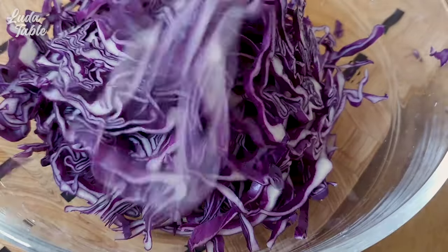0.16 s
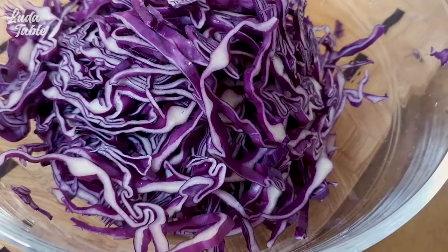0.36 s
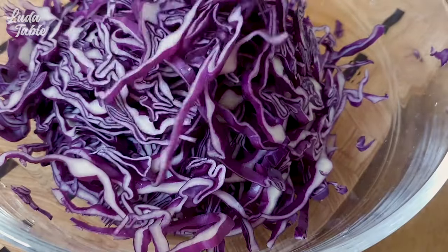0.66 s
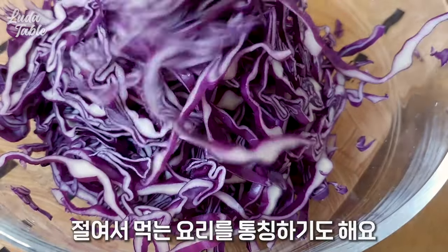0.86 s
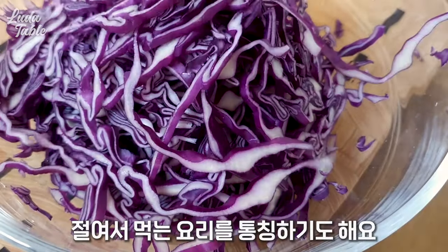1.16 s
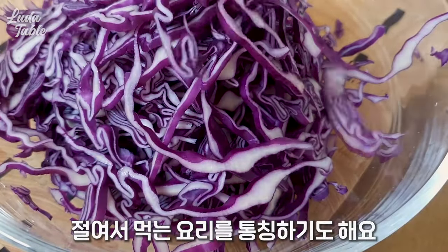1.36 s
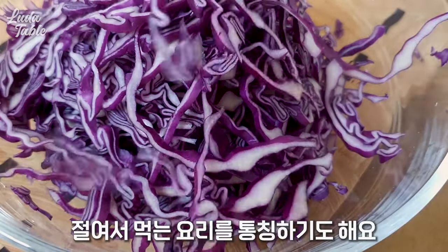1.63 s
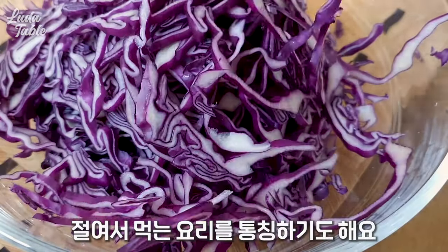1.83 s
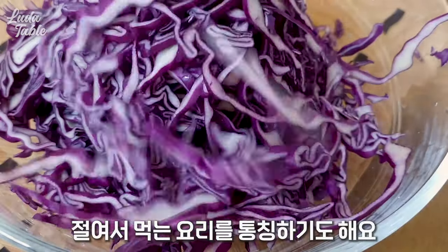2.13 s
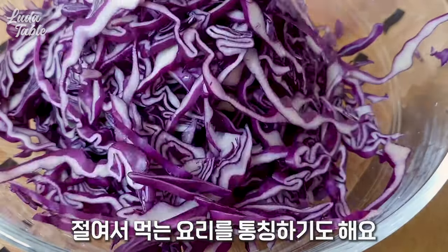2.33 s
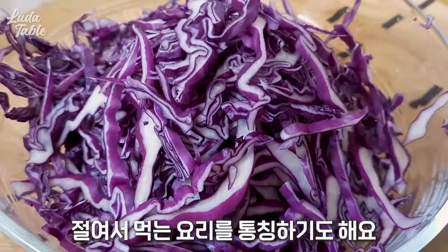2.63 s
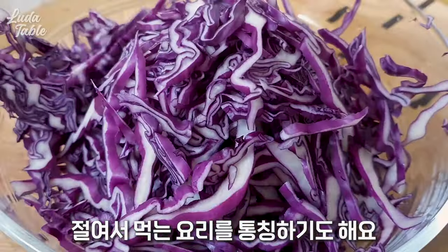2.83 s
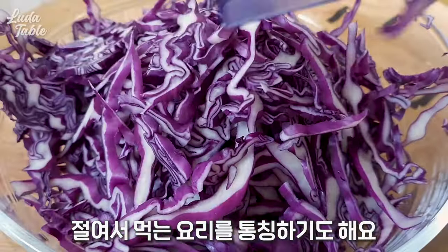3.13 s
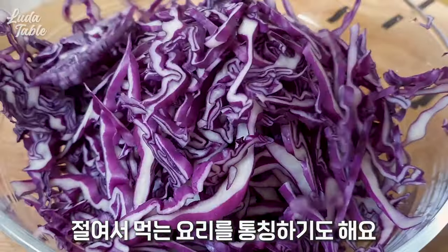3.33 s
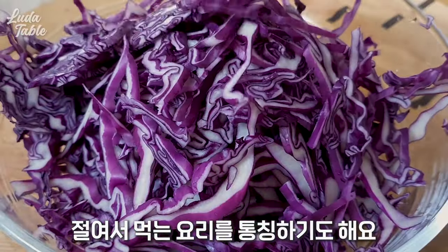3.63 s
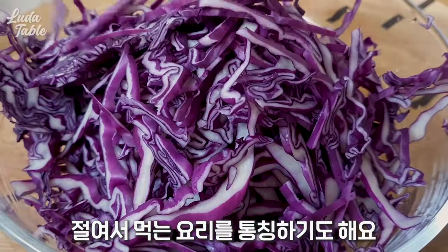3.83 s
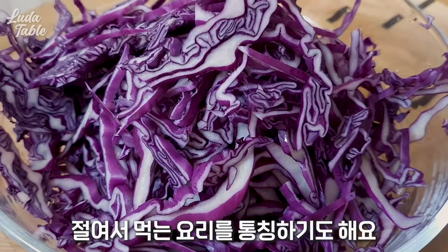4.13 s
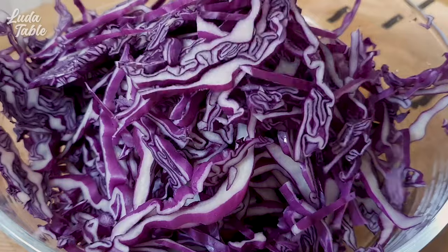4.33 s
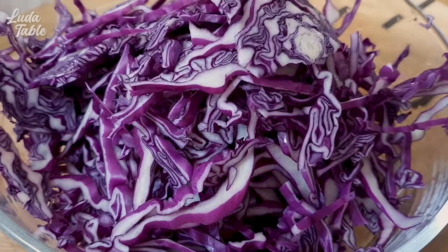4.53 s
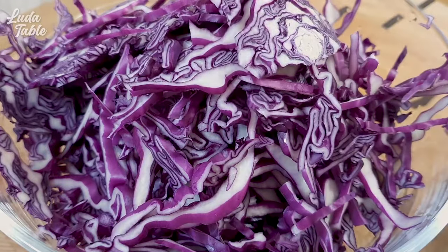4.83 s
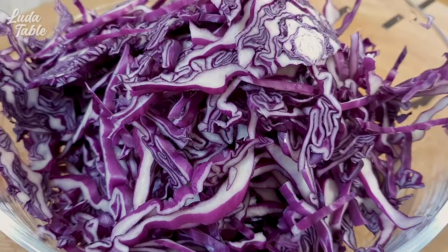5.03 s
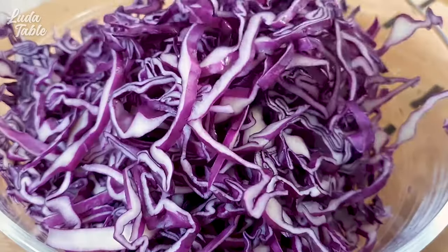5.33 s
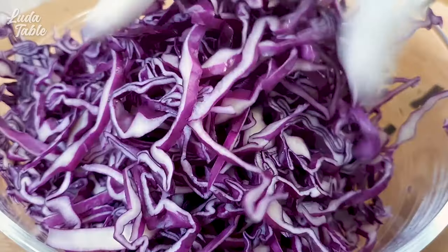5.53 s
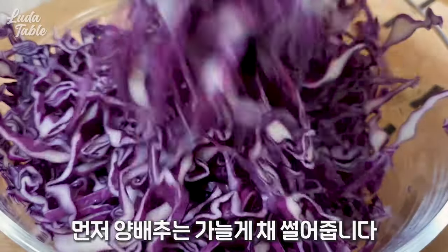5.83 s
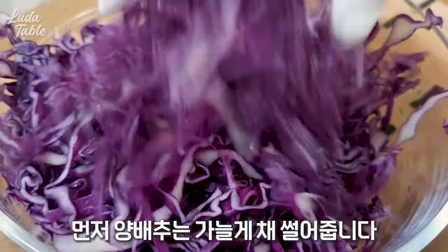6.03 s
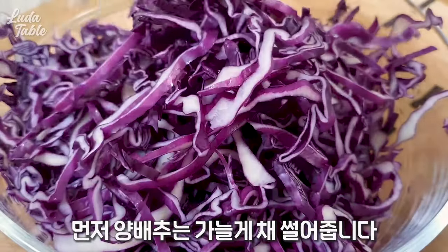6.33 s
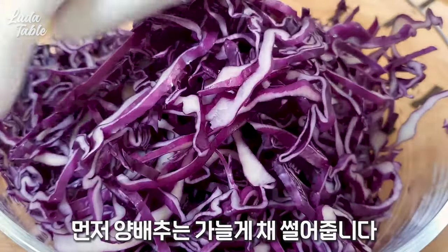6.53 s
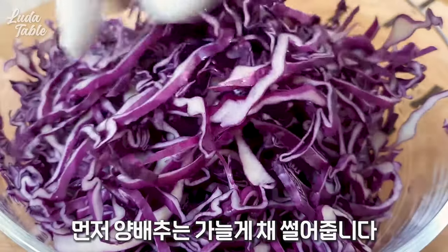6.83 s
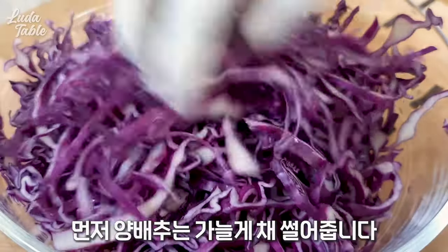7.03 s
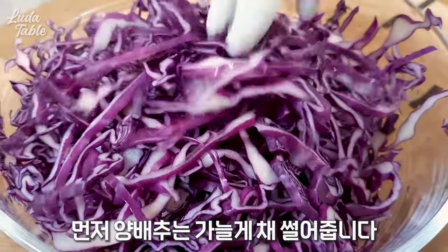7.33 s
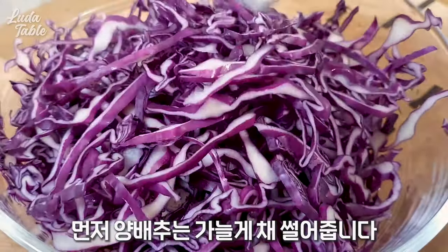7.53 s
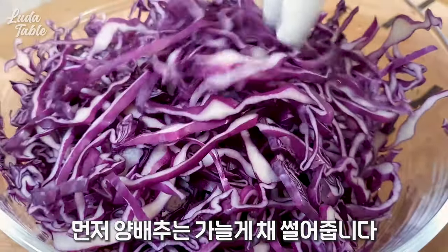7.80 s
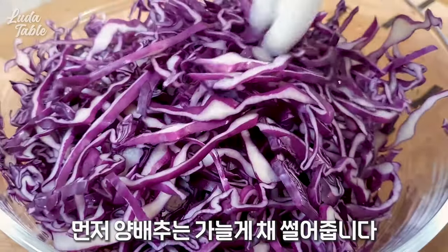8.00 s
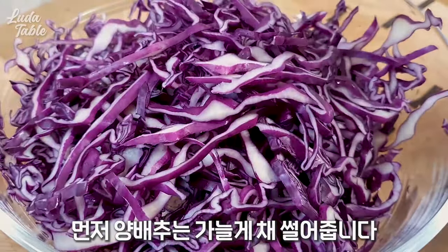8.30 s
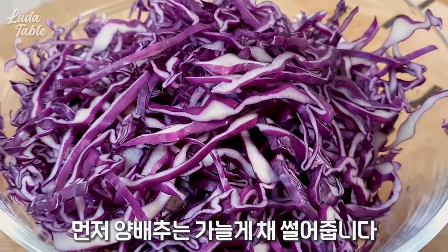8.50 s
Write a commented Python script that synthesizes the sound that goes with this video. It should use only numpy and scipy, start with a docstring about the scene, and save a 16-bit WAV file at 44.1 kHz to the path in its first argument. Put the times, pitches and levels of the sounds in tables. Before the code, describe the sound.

A knife shreds crisp cabbage on a wooden board in quick crunching strokes, speeding up, then shreds rustle softly in a bowl.

```python
"""A knife shreds crisp cabbage on a wooden board, close by: crunching strokes are random bursts of cells,
knocks are noise cracks over ringing board modes, ribs pop as short sines and the blade rings faintly.
The last three strokes are looped, at the end a third faster and higher. After a cut, gloved fingers quietly
toss the shreds in a bowl: swelling bands of grains and tuned taps, over kitchen rumble and hiss of noise."""
import sys
import numpy as np
from scipy import signal
from scipy.io import wavfile
from scipy.ndimage import map_coordinates

SR = 44100
rng = np.random.default_rng(int(sys.argv[2]) if len(sys.argv) > 2 else 0)


def put_to_file(sound):
    """Save the sound as 16-bit audio at rate SR, in the file named by the first command-line argument."""
    columns = np.atleast_2d(sound).T  # one column per channel
    safe = np.clip(columns, -1, 1)
    whole_steps = np.round(safe * 32767)
    wavfile.write(sys.argv[1], SR, whole_steps.astype(np.int16))


def gain_from_db(level_db):
    """Turn a decibel level (scalar or array-like) into a linear amplitude factor."""
    decades = np.asarray(level_db, float) / 20
    return 10 ** decades


N = 381906


def in_time(rows, count):
    """Join the columns of a curve by straight lines over count samples."""
    s, *columns = np.transpose(rows)
    return [np.interp(np.arange(count) / SR, s, column) for column in columns]


def rms_one(x):
    """Scale to unit power."""
    return x / np.sqrt(np.mean(x ** 2) + 1e-20)


def drift(count, per_s):
    """Seven slow random curves through knots of spread 1, per_s knots a second."""
    knots = rng.standard_normal((7, int(count * per_s / SR) + 2))
    at = np.arange(count) * per_s / SR
    return np.array([np.interp(at, np.arange(len(k)), k) for k in knots])


def power_sum(levels_db):
    """Level of several sounds heard together: their powers add."""
    return 10 * np.log10(sum(gain_from_db(2 * db) for db in levels_db))


def swell(t, s, db, rise_s, fall_s):
    """Level that climbs to db at s and sinks again, 20 dB per given time (5 ms at least)."""
    return db - 20 * np.maximum((s - t) / max(rise_s, .005), (t - s) / max(fall_s, .005))


def ring(clicks, hz, t60):
    """Two-pole resonator: a unit click sets a dying sine of height 1 ringing."""
    radius, w = gain_from_db(-60 / (t60 * SR)), 2 * np.pi * hz / SR
    return signal.lfilter([0, np.sin(w)], [1, -2 * radius * np.cos(w), radius ** 2], clicks + 1e-18)


def bank(sources, spectrum, low_hz, high_hz):
    """Third-octave bands, each fed by one source in turn and weighted by the spectrum; rms 1."""
    edges = np.geomspace(low_hz, high_hz, round(3 * np.log2(high_hz / low_hz)) + 1)
    hz, db = np.transpose(spectrum)
    gains = gain_from_db(np.interp(np.log(edges[1:] * edges[:-1]) / 2, np.log(hz), db))
    out = 0
    for k, gain in enumerate(gains):
        band = signal.butter(2, edges[k:k + 2], "band", fs=SR, output="sos")
        out = out + gain * signal.sosfilt(band, sources[k % len(sources)])
    return rms_one(out)


def grains(count, per_s, spread_db, shared, patchy_db):
    """Seven trains of cells bursting at random, in clumps, a few much louder; broad bursts reach every train."""
    sizes = gain_from_db(spread_db * np.minimum(rng.exponential(1, (8, count)), 4))
    signs = rng.choice([-1, 1], (8, count))
    trains = sizes * signs * (rng.random((8, count)) < per_s / SR)
    # fast clumps and a slower change of colour, plus clumps common to all trains
    unevenness = drift(count, 220) + .45 * drift(count, 20) + .7 * drift(count, 130)[0]
    return gain_from_db(patchy_db * unevenness) * (trains[1:] + shared * trains[0])


def bursts(events, count, rise_s, fall_s):
    """Envelope of short blows, each peaking at the level in its second column."""
    clicks, t = np.zeros(count), np.arange(3000) / SR
    clicks[[round(e[0] * SR) for e in events]] = gain_from_db(np.array([e[1] for e in events]))
    shape = np.exp(-t / fall_s) * (1 - np.exp(-t / rise_s))
    return signal.fftconvolve(clicks, shape / shape.max())[:count]


# colour of the steady hiss: pitch_hz, density_db (per Hz)
HISS_COLOUR = [(2650, -23), (4800, 2), (9710, 3.5), (16000, -52)]
# how loud the hiss sits before it wanders: time_s, level_db
HISS_LEVEL = [(4.47, -78), (4.75, -81.5), (5.185, -80.5), (5.205, -76), (5.6, -71.5), (6.5, -77.5),
              (7.2, -79.5), (7.8, -78), (8.0, -80), (8.2, -77.5), (8.65, -79)]
# colour of the low rumble: pitch_hz, density_db (per Hz)
RUMBLE_COLOUR = [(20, -28), (37, -10.5), (59, 0.5), (248, -15.5), (286, -25), (600, -27.5)]
# how loud the rumble sits before handling adds to it: time_s, level_db
RUMBLE_LEVEL = [(4.47, -60.5), (4.75, -78), (5.0, -70), (6.45, -66.5), (7.6, -67), (8.45, -66.5),
                (8.65, -77.5)]


def room(start, bright_db):
    """Kitchen bed: banded noise for murmur, hiss and a rumble that handling the bowl swells."""
    count = N - start
    wander = drift(count, 4.5)   # the room is never quite steady
    murmur_colour = [(400, -5.5), (1000, -3.5), (3300, -14.0)]   # pitch_hz, density_db (per Hz)
    murmur = bank(rng.standard_normal((2, count)), murmur_colour, 487, 3140)
    out = gain_from_db(-83.5 + 4.9 * wander[0]) * murmur
    hiss_db = in_time(HISS_LEVEL, N)[0][start:]
    out += gain_from_db(hiss_db + wander[1]) * bank(rng.standard_normal((2, count)), HISS_COLOUR, 3300, 11500)
    # handling shakes the bowl on the counter
    rumble_gain = gain_from_db(in_time(RUMBLE_LEVEL, N)[0][start:]) + gain_from_db(0.66 * bright_db - 22.0)
    return out + rumble_gain * bank(rng.standard_normal((2, count)), RUMBLE_COLOUR, 22.0, 496)


# shreds drop and tick in the bowl: time_s, strength_db, pitch_hz
DROPS = [(4.773, -53.5, 1680), (5.227, -51, 1510), (5.485, -45, 2370), (5.735, -36, 1626),
         (5.791, -49, 1220), (6.645, -41.5, 1780), (6.708, -28.5, 649), (6.724, -27.5, 1140),
         (6.76, -41.5, 452), (8.119, -45.5, 4700), (8.227, -50, 5500)]


def drops(count, start):
    """A short noisy tap, coloured by the pitch of the piece that falls."""
    out, t = np.zeros(count), np.arange(800) / SR
    puffs = rng.standard_normal((len(DROPS), 800))
    for (s, strength_db, hz), puff in zip(DROPS, puffs):
        at = round(s * SR) - start
        tap = puff * np.exp(-t / .004)
        tap = rms_one(ring(tap, hz, 17.0 / hz)) + 0.29 * rms_one(np.diff(tap, prepend=0))
        out[at:at + len(t)] += gain_from_db(strength_db - 5.0) * tap / np.abs(tap).max()
    return out


# rustles in the bowl: time_s, level_db (ahead of the bowl's colouring), rise_ms and fall_ms (per 20 dB),
# pitch_hz, width_octaves
RUSTLES = [(4.777, -69, 3, 57.5, 1500, 2.24), (5.21, -65, 8, 92, 1899, 1.4),
           (5.346, -62, 46, 84, 2443, 1.0), (5.49, -61.5, 107, 328, 2300, 1.16),
           (5.735, -56, 106, 141, 1100, 1.54), (6.03, -69.5, 29, 204, 1250, .8),
           (6.2, -71, 200, 50, 1970, 0.78), (6.215, -79.5, 100, 600, 2360, 0.29),
           (6.718, -38.5, 45, 73, 1092, 1.9), (6.66, -59.5, 77, 103, 1200, 2.3),
           (6.775, -57, 61, 121, 1200, 2), (7.098, -64, 51.5, 36, 950, 1.82),
           (7.422, -77.5, 193, 120, 1260, .6), (7.595, -65, 15, 87, 801, 1.6),
           (8.033, -69, 30, 300.5, 1300, 2.1), (8.237, -66, 33, 38, 900, 1.77),
           (8.417, -74, 80, 250, 900, 1.6)]


def bright_level(t):
    """Level of the bright rustle: it swells and fades slower than the dull one."""
    below_dull_db, db_per_octave = -7.5, 1.6   # broad rustles reach further into the treble
    lingers = 1.22   # times the dull rise and fall
    levels = []
    for s, db, rise_ms, fall_ms, hz, octaves in RUSTLES:
        level_db = db + below_dull_db + db_per_octave * octaves
        levels.append(swell(t, s, level_db, rise_ms * lingers / 1000, fall_ms * lingers / 1000))
    return power_sum(levels)


# resonances of the bowl under dull rustles: pitch_hz, width_hz, gain_db
BOWL = [(1200, 260, -10), (1740, 170, -9), (2400, 94, -6)]


def rustles(t, bright_db):
    """Shreds slide and tumble: grains in one swelling band per rustle, under a shared bright rustle."""
    sliding = grains(len(t), per_s=2000, spread_db=3.5, shared=0.47, patchy_db=2.5)
    dull = 0
    for k, (s, db, rise_ms, fall_ms, hz, octaves) in enumerate(RUSTLES):
        span = 2 ** (max(octaves, .1) / 2)
        band = signal.butter(2, [hz / span, hz * span], "band", fs=SR, output="sos")
        level_db = swell(t, s, db, rise_ms / 1000, fall_ms / 1000)
        dull = dull + gain_from_db(level_db) * rms_one(signal.sosfilt(band, sliding[k % len(sliding)]))
    dull = signal.sosfilt(signal.butter(4, 3400, fs=SR, output="sos"), dull)   # low-pass, Hz
    resonant = sum(gain_from_db(db) * signal.lfilter(*signal.iirpeak(hz, hz / width_hz, SR), dull)
                   for hz, width_hz, db in BOWL)
    bright_colour = [(3300, -2.0), (5000, -1.5), (11500, -15.5)]   # pitch_hz, density_db (per Hz)
    return 0.88 * dull + resonant + gain_from_db(bright_db) * bank(sliding, bright_colour, 3530, 14000)


def bowl():
    """Tossing shreds in the bowl over the room, from the end of the chopping on."""
    start = round(PIECES[-1][1] * SR)
    t = np.arange(start, N) / SR
    bright_db = bright_level(t)
    out = rustles(t, bright_db) + room(start, bright_db) + drops(len(t), start)
    return np.concatenate([np.zeros(start), out])


# the lifted blade is brushed and rings until it touches again: time_s, lowest_db (lowest mode),
# next_db (next modes), slope_db (per group above them), length_s (5 ms at least)
RINGS = [(.749, -57, -51, -10, .015), (1.139, -68, -68, -7.5, .047), (1.395, -80, -54, -2.5, .019),
         (1.538, -64, -70, -2.5, .05), (1.749, -58, -58, -8.5, .016), (1.970, -71, -61, -3.5, .072),
         (2.196, -49, -52, -9.5, .05), (2.412, -68, -57, 3.5, .016)]
# blade modes in air: pitch_hz, level_db, t60_s, group (0-3)
BLADE = [(1340, 0, .14, 0), (3020, -6, .08, 1), (5235, 0, .14, 1), (7900, 0, .11, 2), (10985, 0, .18, 3),
         (14470, -16, .12, 3)]


def blade(count):
    """Each brush starts the steel modes as dying sines, choked at the next touch."""
    out = np.zeros(count)
    phases = rng.uniform(0, 2 * np.pi, (len(RINGS), len(BLADE)))
    for (s, low_db, next_db, slope_db, length_s), phase in zip(RINGS, phases):
        group_db = [low_db, next_db, next_db + slope_db, next_db + 2 * slope_db]
        at, t = round(s * SR), np.arange(round(max(length_s, .005) * SR)) / SR
        tone = 0
        for (hz, db, t60, group), p in zip(BLADE, phase):
            dying = gain_from_db(group_db[round(group)] + db - 60 * t / t60)
            tone = tone + dying * np.cos(2 * np.pi * hz * t + p)
        out[at:at + len(t)] += tone * np.clip((t[-1] - t) / .002, 0, 1)   # choked over 2 ms
    return out


# thick ribs give way with a hollow pop: time_s, peak_db, pitch_hz, decay_cycles (to die 60 dB)
POPS = [(0.3443, -38, 180, 3), (0.4426, -32.5, 700, 3), (0.6191, -15, 420, 6), (0.631, -20.5, 642, 7.5),
        (1.065, -20, 654, 5.5), (1.4805, -17.5, 808.6, 6.5), (1.889, -26.5, 270, 6.5),
        (1.908, -22.5, 260, 4.5), (1.915, -21, 800, 7), (1.929, -17, 750, 5.5), (2.122, -18, 900, 5),
        (2.131, -24.5, 500, 5), (2.137, -26, 300, 8.5), (2.1679, -33, 500, 2), (2.288, -26, 300, 5),
        (2.308, -23.5, 250, 5), (2.341, -15, 520, 2), (2.428, -39, 1130, 23.5), (2.428, -37, 160, 6)]


def pops(count):
    """Each rib gives a soft push that rings a few cycles at its own pitch."""
    out, t = np.zeros(count), np.arange(1500) / SR
    for s, peak_db, hz, cycles in POPS:
        decay = gain_from_db(-60 * t * hz / max(cycles, 1))
        pop = np.sin(2 * np.pi * hz * t) * decay * (1 - np.exp(-t * hz / 1.5))
        out[round(s * SR):][:len(t)] += gain_from_db(peak_db) * pop / np.abs(pop).max()
    return out


# blade comes down on the board: time_s, strength_db, thud_db and clack_db (re strength), clack_hz
KNOCKS = [(0.0818, -10.5, -24, -10, 2802), (0.6151, -11, -17, -7.5, 2710), (0.7998, -4, -27.5, -7.5, 2300),
          (0.9912, -0.5, -28.5, -4.5, 2600), (1.1933, -6.5, -23, -10.5, 2706),
          (1.4156, -2.5, -23.5, -4.5, 798.4), (1.6145, -9, -14.5, -14, 720),
          (1.8393, -14, -13.5, -5.5, 1504), (2.0475, -13.5, -22.5, 0, 2700),
          (2.2475, -13.5, -23.5, -11.5, 2700)]
# the other end of the edge touches a moment before or after: time_s, strength_db
SECOND_TOUCHES = [(0.0794, -18), (0.8032, -5), (0.9928, 0), (1.19, -21), (1.6183, -13), (1.8421, -6.5),
                  (2.0449, -15)]
# single ribs snap, shreds tick on the wood: time_s, strength_db
SNAPS = [(0.1984, -14), (0.2862, -32.5), (0.3451, -31), (0.3935, -12), (0.4194, -16), (0.4424, -18),
         (0.5581, -22), (0.5945, -27), (0.603, -21), (0.6075, -22), (0.6574, -11), (0.6893, -17),
         (0.7637, -30.5), (0.8939, -5.5), (0.9248, -27), (0.9644, -32.5), (1.454, -13), (1.4794, -7.5),
         (1.5114, -23.5), (1.5314, -28.5), (1.655, -11.5), (1.6794, -5), (1.917, -11), (1.929, -11),
         (2.1145, -7.5), (2.1214, -7.5), (2.131, -7.5), (2.1675, -17.5), (2.2942, -8), (2.307, -8.5),
         (2.3414, -6), (2.381, -34), (2.4284, -26.5)]
# colour of knocks and snaps: pitch_hz, density_db (per Hz)
CRACK = [(1000, -4.5), (2050, -8), (2650, -4), (4410, -6), (7270, -2.5), (16000, -16.5)]
# board modes: pitch_hz, level_db (relative), t60_s
BOARD = [(174, -11, 0.054), (263, -3.5, 0.035), (446, 1.5, 0.01), (706, -3, .025), (1140, -13.5, 0.0061)]


def thuds(count):
    """The blow pushes the board, and its modes ring, a little differently each time."""
    at = [round((s + 0.0017) * SR) for s, *_ in KNOCKS]
    blow_db = np.array([db + thud_db for s, db, thud_db, *_ in KNOCKS])
    variation_db = rng.normal(0, 1, (len(KNOCKS), len(BOARD)))
    thud = 0
    for k, (hz, level_db, t60) in enumerate(BOARD):
        clicks = np.zeros(count)
        clicks[at] = -gain_from_db(blow_db + level_db + 6.5 + variation_db[:, k])
        thud = thud + ring(clicks, hz, t60)
    return signal.sosfilt(signal.butter(4, 100, "high", fs=SR, output="sos"), thud)


def knocks(count):
    """One or two cracks of a few ms, a duller afterclap, a clack and the thud of the board; also snaps."""
    crackle = bank(grains(count, per_s=13000, spread_db=2.0, shared=0.3, patchy_db=1.5), CRACK, 1300, 16000)
    crack = gain_from_db(-9.5) * bursts(KNOCKS + SECOND_TOUCHES, count, 0.0008, 0.001)
    crack += gain_from_db(-28.5) * bursts(KNOCKS, count, 0.019, 0.004)   # afterclap
    snaps = gain_from_db(-11) * bursts(SNAPS, count, .0003, 0.0012)
    snaps += gain_from_db(-31.5) * bursts(SNAPS, count, 0.0013, 0.0051)
    out = (crack + snaps) * crackle + thuds(count)
    t, clack_t60_s = np.arange(600) / SR, .008   # short ring of edge on wood
    for s, db, thud_db, clack_db, hz in KNOCKS:
        decay = gain_from_db(db + clack_db - 60 * t / clack_t60_s)
        out[round(s * SR):][:len(t)] += decay * np.sin(2 * np.pi * hz * t) * (1 - np.exp(-t / .0003))
    return out


# strokes through the leaves: bite_s (edge bites), hardest_s, through_s (edge is through), crunch_db,
# board_db (relative), landing_db (board as the edge lands, relative)
STROKES = [(0.111, 0.148, 0.2, -19, -26, -33.5), (0.378, 0.394, 0.41, -21, -29, -30.5),
           (0.61, 0.623, 0.65, -17, -24, -30.5), (0.697, 0.7, 0.72, -30, -36.5, -38),
           (0.825, 0.856, 0.9, -22, -30.5, -34.5), (1.015, 1.062, 1.087, -19, -28, -28),
           (1.209, 1.242, 1.28, -21.5, -27.5, -37), (1.44, 1.482, 1.501, -23, -27, -39.5),
           (1.637, 1.666, 1.714, -22, -29.5, -30.5), (1.871, 1.922, 1.954, -22, -31, -37),
           (2.07, 2.12, 2.15, -19, -31, -33), (2.268, 2.316, 2.353, -21.5, -33.5, -35.5)]
# one stroke's crunch re its hardest, at four moments: touch_db, bite_db, halfway_up_db, let_go_db
CRUNCH_SHAPE = [-50, -19.5, -5.5, -46]
# the same four moments for the board: touch_db, bite_db, halfway_up_db, let_go_db
BOARD_SHAPE = [-36.5, -19.5, -6.5, -24]
# levels at rest: crunch_db, board_db (relative)
QUIET = (-84, -71.5)
# loose shreds crumble between strokes: time_s, crunch_db, board_db (relative),
# swell_s (to swell or fade 20 dB; 5 ms at least, so zero and below mean 5 ms)
CRUMBLES = [(0.018, -67, -52, 0), (.26, -70, -72, 0.5), (0.359, -66, -42.5, -0.14), (.43, -53, -47, -0.27),
            (.49, -69, -48, -0.34), (.6, -46.5, -50.5, 0.17), (.77, -64, -53.5, -0.13),
            (.947, -52, -55.5, 0.31), (1.137, -61.5, -48.5, -0.9), (1.767, -56, -47, 0),
            (2.185, -61, -55.5, -0.04), (2.39, -64, -55.5, 0.25)]


def stroke_levels(count):
    """Crunch and board level: every stroke has one shape, stretched to its three moments."""
    touch_s, let_go_s = .017, 0.017   # touch before the bite, dying after the cut
    sag_db = -8   # the crunch has eased off when the edge is through
    t, out = np.arange(count) / SR, []
    # what lingers after letting go fades by so many dB in a second
    for k, (shape, fade_db) in enumerate([(CRUNCH_SHAPE, 280), (BOARD_SHAPE, 231.5)]):
        touch, bite, halfway, gone = shape
        parts = [np.full(count, QUIET[k])]
        parts += [swell(t, s, db[k], swell_s, swell_s) for s, *db, swell_s in CRUMBLES]
        for a, b, c, *db, landing_db in STROKES:
            through = (sag_db, landing_db - db[1])[k]
            moments = [a - 2 * touch_s, a - touch_s, a, (a + b) / 2, b, c, c + let_go_s, c + let_go_s + 1]
            levels = [-100, touch, bite, halfway, 0, through, gone, gone - fade_db]
            parts.append(db[k] + np.interp(t, moments, levels))
        out.append(power_sum(parts))
    return out


# colour of the crunch: pitch_hz, density_db (per Hz)
CRUNCH = [(50, -36), (189, 2), (258, -1), (1660, -8), (1780, -3), (2210, -11), (2950, -1.5), (4560, -5.5),
          (5400, -2), (16000, -13)]
# top treble and middle of the crunch, re the crunch: time_s, treble_db, middle_db
TREBLE = [(0, -22, -7), (1.3, -17, -7.5), (1.6, -9, -8.5)]


def shredding(count):
    """The edge tears cells open in a dense crackle; the strokes also shake the board and the blade."""
    crunch_db, board_db = stroke_levels(count)
    # ribs and soft leaf pass under the edge, so the tearing comes in clumps
    tearing = grains(count, per_s=2500, spread_db=4.0, shared=0.5, patchy_db=3.0)
    treble_db, middle_db = in_time(TREBLE, count)
    crunch = gain_from_db(crunch_db) * bank(tearing, CRUNCH, 3300, 16000)
    crunch += gain_from_db(crunch_db + middle_db) * bank(tearing[::-1], CRUNCH, 1100, 3300)
    crunch += gain_from_db(crunch_db + treble_db) * bank(tearing[::-1], CRUNCH, 12000, 15000)
    # the low middle needs both tearing and a shaking board, so it dies first between strokes
    body = gain_from_db(.25 * crunch_db + 0.84 * board_db - 3.0) * bank(tearing, CRUNCH, 400, 1100)
    board = gain_from_db(board_db - 5.0) * bank(rng.standard_normal((2, count)), CRUNCH, 110, 400)
    # the lowest board mode hums on, following a share of the board's swing
    hum_db, hum_follows, hum_t60_s = -36, .35, .09
    shaking = rms_one(ring(rng.standard_normal(count), BOARD[0][0], hum_t60_s))
    board += gain_from_db(hum_db + hum_follows * board_db) * shaking
    # gripped by the leaves, the blade modes ring a tenth as long as in air
    steel = sum(ring(crunch, hz, .1 * t60) for hz, db, t60, group in BLADE[1:])
    return crunch + body + board + gain_from_db(-40.5) * steel


# the three strokes that repeat: first_s, last_s
LOOP = (1.8666, 2.445)
# pieces of the chopping laid end to end: start_s, end_s, position_s (where playing begins), speed (ratio)
PIECES = [(0, 2.445, 0, 1), (2.445, 2.98, 2.445, 1), (2.98, 3.43, 2.9912, 1),
          (3.4626, 4.462, 2.4279, 4 / 3)]
# one gain for each piece: gain_db
PIECE_GAINS = [0.017, 1.5, -2.2, 0.071]


def looped(chopping):
    """Play the pieces; past the loop end the position wraps back; a faster piece also sounds higher."""
    out, (first, last) = np.zeros(N), LOOP
    for (start, end, position, speed), gain_db in zip(PIECES, PIECE_GAINS):
        at = np.arange(round(start * SR), round(end * SR))
        s = position + speed * (at / SR - start)
        s = np.where(s < last, s, first + (s - first) % (last - first))
        out[at] = gain_from_db(gain_db) * map_coordinates(chopping, [s * SR], order=3)
    return out


def scene():
    """The chopping, cut and looped, then the bowl."""
    count = round(LOOP[1] * SR) + 2000
    chopping = shredding(count) + knocks(count) + pops(count) + blade(count)
    # microphone bass cut
    chopping = signal.sosfilt(signal.butter(3, 90, "high", fs=SR, output="sos"), chopping)
    return (looped(chopping) + bowl())[None]


def low_pass(x):
    """Removes everything above the highest recorded frequency."""
    return signal.sosfilt(signal.butter(12, 15900, fs=SR, output="sos"), x)


def record(dry):
    """Soft saturation rounds the highest peaks of the mix."""
    mix = np.tanh(dry)
    return low_pass(mix)


dry = scene()
out = record(dry)
put_to_file(out)
```